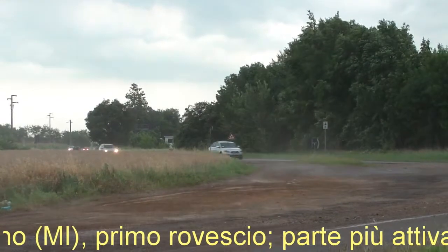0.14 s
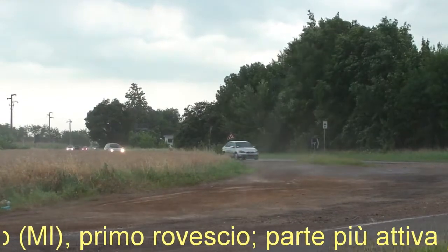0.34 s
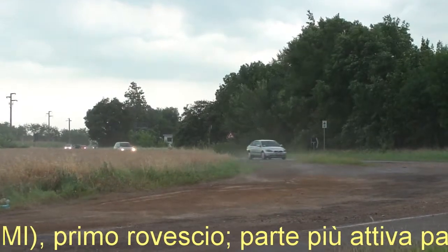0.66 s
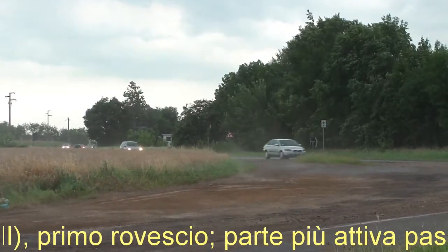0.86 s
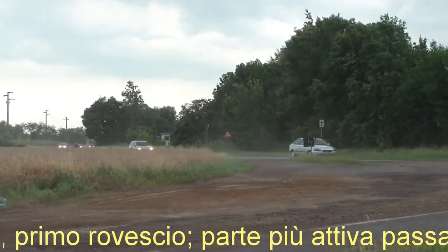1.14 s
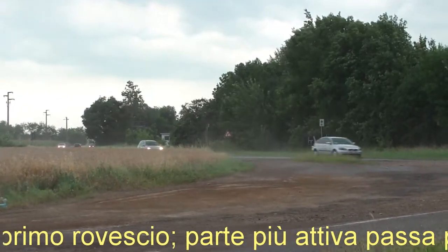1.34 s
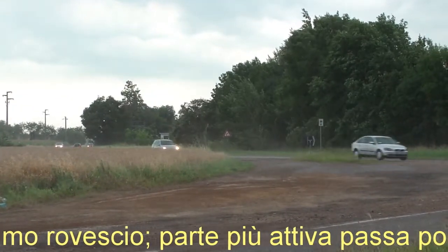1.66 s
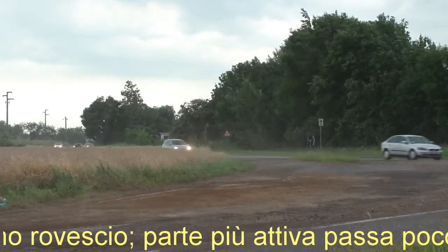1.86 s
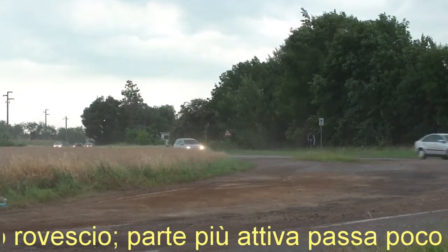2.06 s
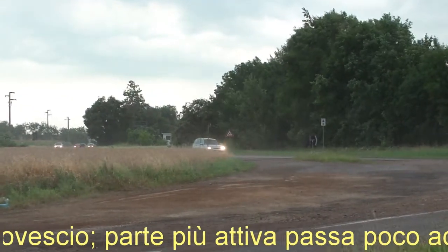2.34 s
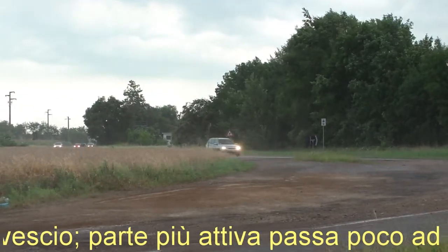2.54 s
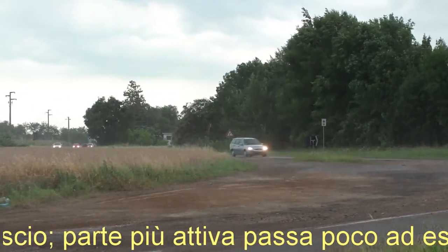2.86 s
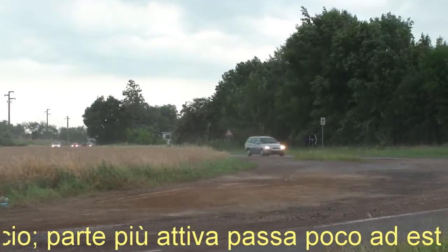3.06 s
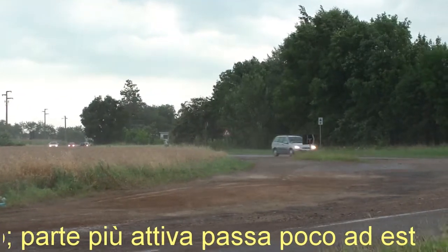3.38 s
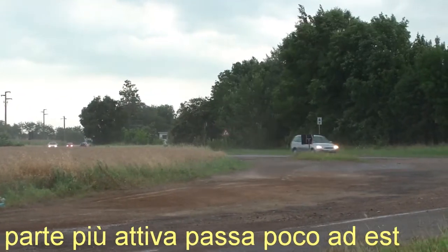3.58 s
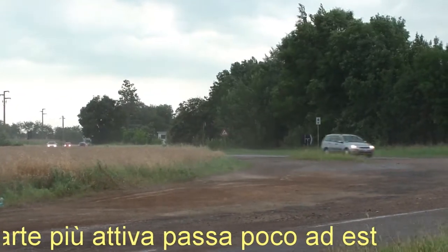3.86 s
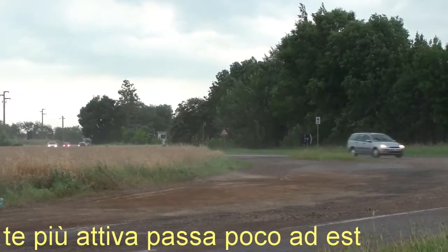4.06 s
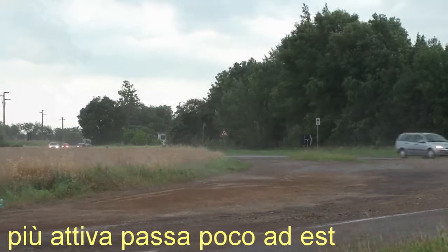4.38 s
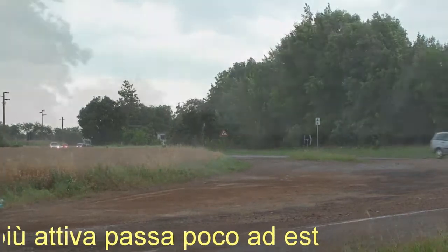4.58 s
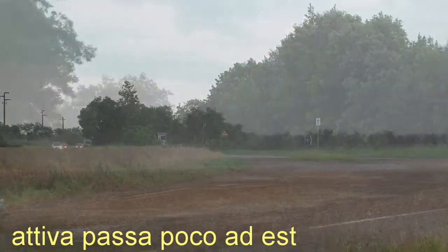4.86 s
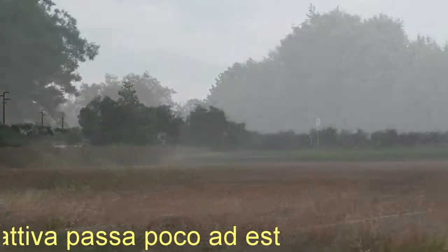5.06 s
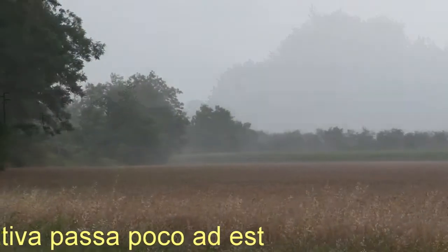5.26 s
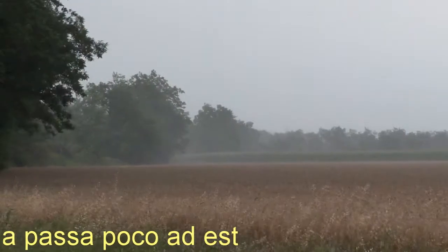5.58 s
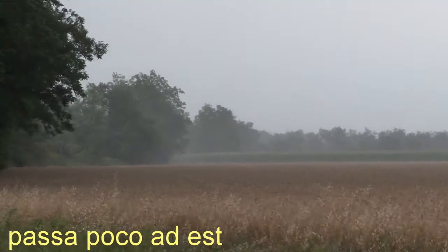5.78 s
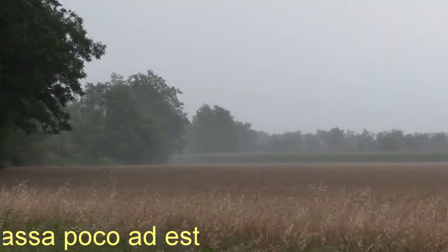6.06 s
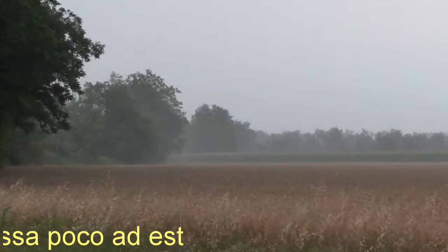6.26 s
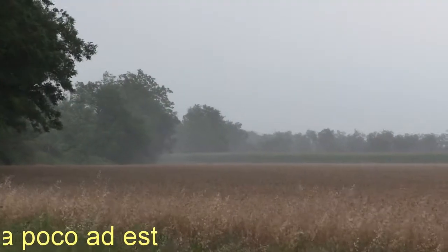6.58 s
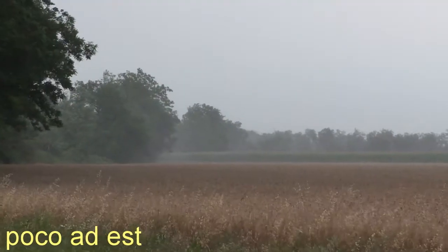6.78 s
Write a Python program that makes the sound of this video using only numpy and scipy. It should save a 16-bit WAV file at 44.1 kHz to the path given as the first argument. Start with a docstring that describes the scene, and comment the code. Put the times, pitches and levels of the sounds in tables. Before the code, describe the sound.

Gusty wind buffets an exposed microphone in fluttering bursts while dense rain hisses all round and hard drops tick sharply close by.

```python
"""Open fields in a squall, heard from a small stereo microphone standing in the wind.
On the grille, gusts flutter as shaken bands of noise, with popping vortices and a few breathy notes;
a low rumble of filtered noise lies under them and strengthens near the end.
All round, dense rain hisses as noise; close by, flurries of spray crackle and hard drops tick as
short ringing bursts. One heavy drop knocks on the housing."""
import sys
import numpy as np
from scipy import signal
from scipy.fft import rfft, irfft, next_fast_len
from scipy.io import wavfile
from scipy.ndimage import uniform_filter1d

SR = 44100
rng = np.random.default_rng(int(sys.argv[2]) if len(sys.argv) > 2 else 0)


def inscribe(sig):
    """Save sig as 16-bit PCM at rate SR to the path in sys.argv[1].

    A 1-D sig is mono; a 2-D sig holds one channel per row.
    Samples are clipped to [-1, 1] before scaling.
    """
    pcm = np.round(np.clip(np.atleast_2d(sig).T, -1, 1) * 32767)
    wavfile.write(sys.argv[1], SR, pcm.astype(np.int16))


N = 305613
T = np.arange(N) / SR

# Levels in the tables are those before the trims set in scene().
# strength of the wind at the grille: (time [s], level [dB])
WIND_LEVEL = [(0.0, -21), (1.58, -21.5), (1.77, -26), (2.01, -23.5), (2.3, -22), (2.53, -17), (2.91, -22),
              (3.3, -18.5), (3.59, -26.5), (3.98, -22), (4.4, -30.5), (4.65, -25.5), (4.8, -26),
              (5.09, -23), (5.54, -26.5), (5.98, -22), (6.52, -27.5), (6.93, -22)]
# brief lulls, when the wind drops away: (time [s], depth [dB])
WIND_LULLS = [(0.46, 2.5), (0.525, 6), (0.85, 4.5), (1.243, 12), (1.575, 4), (1.77, 6), (1.92, 4),
              (2.254, 7), (2.935, 6), (3.14, 2), (3.63, 1), (4.095, 6.5), (4.59, 5.5), (5.39, 3), (6.25, 0),
              (6.86, 3)]
# the hardest eddies striking the grille: (time [s], level [dB], nominal length [s])
HARD_BUFFETS = [(0.003, -11, 0.014), (0.046, -12.5, 0.0066), (0.119, -13.5, 0.014), (0.205, -16.5, 0.03),
                (0.242, -13.5, 0.041), (0.288, -22, 0.0098), (0.326, -14, 0.03), (0.39, -15.5, .022),
                (0.477, -14.5, 0.02), (0.656, -17.5, 0.027), (0.729, -14, 0.013), (0.877, -19.5, 0.022),
                (0.908, -18, .027), (0.965, -13, 0.022), (1.0, -15, 0.0087), (1.039, -14, 0.016),
                (1.077, -11.5, 0.023), (1.107, -16, 0.012), (1.278, -15, 0.035), (1.306, -12.5, 0.017),
                (1.5, -13, 0.01), (1.615, -16.5, 0.03), (1.679, -16.5, 0.05), (1.788, -20, 0.02),
                (1.815, -24, 0.017), (1.974, -23.5, 0.047), (2.079, -15, 0.051), (2.139, -15, 0.037),
                (2.18, -6, 0.0071), (2.197, -14, 0.026), (2.237, -16.5, 0.013), (2.264, -12.5, 0.024),
                (2.287, -13.5, 0.066), (2.353, -6.5, 0.016), (2.379, -10, 0.02), (2.527, -7.5, 0.014),
                (2.56, -6.5, 0.0048), (2.622, -12, 0.025), (2.788, -13, 0.021), (2.81, -12.5, 0.016),
                (2.978, -6.5, 0.007), (3.041, -15.5, 0.015), (3.096, -16.5, 0.016), (3.161, -17, 0.0087),
                (3.2, -16.5, 0.027), (3.247, -15, 0.028), (3.29, -29, 0.0094), (3.317, -15.5, 0.039),
                (3.351, -9, 0.02), (3.443, -14, 0.014), (3.503, -20, 0.039), (3.541, -18, .014),
                (3.652, -16.5, 0.016), (3.725, -18, 0.052), (3.802, -14, 0.015), (3.827, -20, 0.016),
                (3.88, -18, 0.029), (3.916, -10.5, 0.014), (3.963, -16.5, 0.022), (3.996, -17.5, 0.011),
                (4.151, -13.5, 0.036), (4.26, -21.5, .01), (4.319, -20, 0.014), (4.37, -16.5, 0.023),
                (4.619, -20.5, 0.015), (4.661, -23, 0.043), (4.742, -24, 0.0071), (4.834, -17.5, 0.012),
                (4.931, -18, .012), (5.026, -20, 0.0078), (5.123, -21.5, 0.016), (5.182, -16, 0.03),
                (5.261, -16, 0.04), (5.303, -17.5, 0.018), (5.416, -21, 0.036), (5.749, -18.5, .015),
                (5.859, -14.5, 0.023), (5.961, -16.5, 0.03), (6.017, -19, 0.033), (6.06, -13, 0.042),
                (6.135, -14, .01), (6.278, -17.5, 0.02), (6.386, -13, 0.0086), (6.461, -19, 0.044),
                (6.655, -17, 0.016), (6.694, -18.5, 0.025), (6.77, -18, 0.027), (6.902, -15.5, 0.02)]
# brightness of the flutter: (time [s], tilt [dB per octave])
FLUTTER_TILT = [(0.0, 1), (1.4, 0.3), (2.1, 2.5), (3.35, 0.1), (3.9, 3), (4.55, -1.1), (5.0, 0.7),
                (6.93, 0.6)]
# the wind sound leans further left over this stretch: (time [s], left over right [dB])
WIND_LEAN = [(4.5, 0.1), (5.2, 1.46)]
# spectrum of the flutter on the grille: (frequency [Hz], relative level per hertz [dB])
FLUTTER_SPECTRUM = [(30, -70), (100, -51), (200, -29), (330, -7), (520, -2), (700, 2), (900, -2.5),
                    (1200, -3.5), (1750, -8.5), (2200, -14), (2600, -23), (3000, -31), (4500, -32),
                    (12000, -68)]
# likeness of the two microphone channels in the wind: (frequency [Hz], correlation [-1 to 1])
WIND_CORRELATION = [(25, .25), (70, 1), (150, 0.98), (500, 0.96), (1200, 0.94), (2400, 0.82), (5000, 0.3)]
# breathy notes of wind in the housing:
# (time [s], level [dB], nominal length [s], frequency [Hz], resonance width [Hz])
HOUSING_NOTES = [(1.167, -27, 0.06, 1300, 380), (1.302, -14, 0.022, 690, 160), (2.348, -16, 0.02, 710, 200)]
# level of the rumble against the flutter: (time [s], level [dB])
RUMBLE_LEVEL = [(0.0, 0), (1.2, 4.5), (2.2, 0), (3.5, -2.5), (4.2, 4), (4.85, -0.5), (5.4, 11.5),
                (6.05, 8.5), (6.5, 12), (6.93, 8.5)]
# spectrum of the large eddies: (frequency [Hz], relative level per hertz [dB])
RUMBLE_SPECTRUM = [(30, -57), (70, -58), (100, -13.5), (130, -9), (188, 3.5), (250, -2), (330, 3),
                   (550, -1), (1200, -66), (4000, -80)]
# deep thumps of wind: (time [s], level [dB], nominal length [s])
WIND_THUMPS = [(0.97, -30, 0.045), (5.29, -38, .05), (5.42, -32, 0.046), (5.725, -22.5, 0.049),
               (6.14, -24, 0.058), (6.64, -31, 0.05)]
# spectrum of the thumps: (frequency [Hz], relative level per hertz [dB])
THUMP_SPECTRUM = [(30, -40), (60, -34), (95, -10), (130, 3.5), (175, 6), (260, -4), (600, -30), (2000, -90)]
# spectrum of the steady roar of the air: (frequency [Hz], relative level per hertz [dB])
AIR_SPECTRUM = [(20, -30), (35, -22), (60, 3), (100, 7), (250, -24), (1500, -70)]
# hard drops close by: (time [s], level of the energy spread over 1 ms [dB], left over right [dB])
HARD_DROPS = [(0.0137, -14, -1), (0.325, -16.5, 2), (0.431, -21, 13), (0.4608, -9, 5), (0.621, -18, 1),
              (0.6666, -18, 1), (0.7348, -15, 4), (0.917, -15.5, 3), (0.9376, -19, 0), (1.087, -13, 0),
              (1.495, -16, 5), (1.7745, -20, 4), (1.7885, -21, 0), (1.964, -19, 3), (2.1976, -16, 4),
              (2.4084, -14.5, 0), (2.4825, -22, 3), (2.5723, -20, -1), (2.5867, -8.5, 2), (2.745, -11, 2),
              (2.7682, -10, -2), (2.8122, -9.5, 3), (2.8459, -22, 2), (2.8662, -17.5, 4),
              (2.8915, -13.5, 2), (2.956, -25, 3), (2.9676, -24, 4), (3.0522, -16, 2), (3.0614, -11.5, 2),
              (3.0821, -16.5, 0), (3.1019, -20, 2), (3.1244, -14, 3), (3.1582, -19, 1), (3.2215, -18, 2),
              (3.2464, -3.5, 7), (3.2574, -19, 3), (3.295, -20, 0), (3.344, -6, 0), (3.405, -9, 2),
              (3.438, -14, 3), (3.463, -14.5, -3), (3.488, -19, 2), (3.6034, -16, 2), (3.6447, -19, 3),
              (3.653, -13.5, 5), (3.6774, -19, 2), (3.7029, -20, 5), (3.7417, -18, 0), (3.7631, -17, 0),
              (3.8354, -13, 6), (3.906, -13.5, 5), (3.916, -17, 2), (3.9625, -14, 5), (4.039, -11, 4),
              (4.0847, -9, 0), (4.1308, -13, -2), (4.1485, -26, 2), (4.205, -18, 6), (4.23, -14, 3),
              (4.275, -21, 4), (4.386, -16.5, 14), (4.4372, -19.5, 3), (4.4492, -16.5, 2), (4.652, -19, -4),
              (5.3932, -12, 3), (5.7042, -19, -6), (5.9057, -14.5, -1), (5.9605, -20.5, -11),
              (6.2113, -23, -6), (6.69, -14, 1)]
# resonances of the struck housing: (frequency [Hz], width [Hz], peak level [dB])
HOUSING_MODES = [(1000, 700, -14), (1660, 185, -10), (2320, 160, -17.5)]
# the strongest flurries of blown spray: (time [s], level [dB], nominal length [s])
STRONG_FLURRIES = [(0.429, -33.5, 0.015), (0.539, -25.5, 0.0043), (2.083, -32, 0.032),
                   (2.135, -31.5, 0.025), (2.181, -27.5, 0.019), (2.486, -30.5, 0.016), (2.558, -32, 0.011),
                   (2.733, -27, 0.016), (3.202, -30.5, 0.011), (3.254, -38, 0.008), (3.824, -32.5, 0.025),
                   (4.12, -27.5, 0.018), (5.864, -34, 0.0068)]
# spectrum of the spray: (frequency [Hz], relative level per hertz [dB])
SPRAY_SPECTRUM = [(200, -24), (1500, 7.5), (2600, -9), (3400, -7.5), (4300, -5.5), (5000, -4.5),
                  (6100, 3.5), (7300, -1), (9600, -4.5), (10800, -10), (11600, -45)]
# strength of the rain all round: (time [s], level [dB])
RAIN_LEVEL = [(0.0, -36), (0.77, -36), (1.77, -38), (2.7, -34.5), (3.55, -35.5), (4.05, -34.5), (4.73, -40),
              (4.94, -40.5), (6.93, -40.5)]
# spectrum of the far rain: (frequency [Hz], relative level per hertz [dB])
HISS_SPECTRUM = [(700, -7), (2000, 5.5), (2900, -9), (4000, -9), (5000, -8), (5800, 3.5), (7200, 4.5),
                 (8300, 2), (9700, 2), (10600, -3), (11400, -14), (12200, -48)]
# likeness of the two microphone channels in the rain: (frequency [Hz], correlation [-1 to 1])
RAIN_CORRELATION = [(1000, -0.94), (3000, 0.9), (6000, 0.24), (8500, -0.07), (11000, -0.26)]
# the recorder's tone filter hollows out the presence range: (frequency [Hz], width [Hz])
TONE_NOTCHES = [(3010, 430), (4000, 590), (5010, 670)]

LULL_S = 0.028
# the flow stalls ahead of each hard buffet
STALL_DB, STALL_S = 5.5, 0.014
# lesser eddies come at uneven gaps, at a level relative to the wind
EDDIES_PER_S, EDDY_DB, EDDY_SPREAD_DB, EDDY_S = 30, -4, 1, 0.0076
# the rumble takes a share of the wind's slow swings (gusts) and fast ones (eddies)
USUAL_WIND_DB, RUMBLE_DB = -25, -38.5
RUMBLE_FOLLOWS_GUST, RUMBLE_FOLLOWS_EDDY = 0.98, 0.62
# pitch of each hard drop strays around a centre
DROP_HZ, DROP_SPREAD_OCTAVES = 7050, 0.22
# big drops ring in a wider resonance: dB of width per dB of size
DROP_WIDTH_HZ, DROP_WIDENING = 3300, 0.27
SPLASH_S, SPLASH_TAIL_DB, SPLASH_TAIL_S = 0.0005, -22, 0.003
KNOCK_S = 0.541
# a small drop rings for only a cycle or two, so its resonance is wide
PATTER_WIDTH_HZ = 3000
# lesser flurries, relative to the rain; they grow faster than the rain itself (extra dB per dB)
FLURRIES_PER_S, FLURRY_DB, FLURRY_SPREAD_DB = 41, -3, 2
FLURRY_S, FLURRY_GROWTH = 0.0079, 0.33
TREBLE_END_HZ, CUTOFF_HZ = 11200, 15700


def flutter(level_db, tilt_db, base_db, buffet_db, shake_db, patchy_db, wander_db, lag_cycles, bright):
    """Turbulence on the grille: bands shake together, their colour wanders and the lows come late."""
    steady = from_db(level_db + base_db + shake_db * jolts(per_s=56, fade_s=0.023))
    lesser_rows = lesser_bursts(EDDIES_PER_S, EDDY_DB, EDDY_SPREAD_DB, EDDY_S)
    lesser = burst_power(lesser_rows, attack_s=0.003, stretch=0.99)
    hard = burst_power(HARD_BUFFETS, attack_s=0.0003, stretch=0.9, rise_share=0.11)
    flow = steady ** 2 + from_db(level_db) ** 2 * lesser
    flow = flow * from_db(-stalls()) ** 2
    force = np.sqrt(flow + from_db(buffet_db) ** 2 * hard)
    eddy = force / from_db(level_db + base_db)  # force against the plain wind
    # brightness follows the tilt, almost the same for weak and strong eddies
    octave_gain = from_db(tilt_db) * eddy ** bright
    centres = np.geomspace(300, 2400, 13)
    bands = noise_bands(FLUTTER_SPECTRUM, WIND_CORRELATION, centres)
    # the noise's own swings are evened out, so the eddies set the level
    swing = np.sqrt(uniform_filter1d(np.mean(sum(bands) ** 2, axis=0), size=400))
    swing = uniform_filter1d(swing, size=200)
    out = 0
    for hz, band in zip(centres, bands / swing):
        late_s = lag_cycles * (1 / hz - 1 / centres[-4])
        coloured_force = force * octave_gain ** np.log2(hz / np.median(centres))
        envelope = np.interp(T - late_s, T, coloured_force)
        patches_db = patchy_db * jolts(per_s=90, fade_s=0.0047)
        out = out + band * envelope * from_db(patches_db + wander_db * drift(7.2))
    return out, eddy


def lulls():
    """How far the wind has dropped, in dB: each lull eases in and out."""
    return sum(db * np.exp(-((T - s) / LULL_S) ** 2) for s, db in WIND_LULLS)


def stalls():
    """How far the flow has sagged, in dB: it sinks ahead of a hard buffet and returns with it."""
    starts = np.append(np.sort(np.array(HARD_BUFFETS)[:, 0]), 2 * N / SR)
    wait_s = starts[np.searchsorted(starts, T)] - T
    return STALL_DB * np.exp(-(wait_s / STALL_S) ** 2)


def burble(level_db, eddy, trim_db, per_s, spread_db, cycles, count):
    """Single vortices pop inside the eddies, each ringing for a few cycles at a pitch of its own."""
    born = np.flatnonzero(rng.random(N) < per_s / SR)
    size, pitch, sign = rng.random((len(born), 3)).T
    strength = rms_one(from_db(spread_db * size)) * np.sign(sign - 0.5)
    strength = strength * eddy[born] * from_db(level_db[born])
    out = 0
    for k, hz in enumerate(np.geomspace(420, 2100, count)):
        clicks = np.zeros(N)
        clicks[born] = strength * ((pitch * count).astype(int) == k)
        out = out + ring(clicks, hz, hz / cycles) * from_db(at_hz(FLUTTER_SPECTRUM, hz))
    out = signal.sosfilt(signal.butter(4, 2600, fs=SR, output="sos"), out)
    wind_rms = np.sqrt(np.mean((eddy * from_db(level_db)) ** 2))
    return rms_one(out) * wind_rms * from_db(trim_db)


def rumble(wind_db, eddy, bass_db, lumpy_db, thump_db, air_db, inertia_s):
    """Large eddies push the whole microphone, swelling with gusts, over thumps and a faint steady roar."""
    body, = noise_bands(RUMBLE_SPECTRUM, WIND_CORRELATION, [1])
    thump, = noise_bands(THUMP_SPECTRUM, WIND_CORRELATION, [1])
    air, = noise_bands(AIR_SPECTRUM, WIND_CORRELATION, [1])
    thump = thump * np.sqrt(burst_power(WIND_THUMPS, attack_s=0.014, stretch=0.82))
    # the microphone's inertia smooths the eddies
    push = rms_one(uniform_filter1d(eddy, int(inertia_s * SR)) ** RUMBLE_FOLLOWS_EDDY)
    level_db = RUMBLE_DB + RUMBLE_FOLLOWS_GUST * (wind_db - USUAL_WIND_DB) + bass_db
    body = body * push * from_db(level_db + lumpy_db * drift(4.8))
    return body + thump * from_db(thump_db) + air * from_db(air_db)


def whoops():
    """Now and then an eddy catches an opening in the housing, which sounds a breathy note."""
    out = 0
    for s, db, length_s, hz, width_hz in HOUSING_NOTES:
        breath = rng.standard_normal(N)
        note = rms_one(ring(ring(breath, hz, width_hz), hz, width_hz))
        note = note / np.sqrt(uniform_filter1d(note ** 2, size=500) + 1e-9)  # evened out
        power = burst_power([(s, db, length_s)], attack_s=0.0029, stretch=1.0)
        out = out + note * np.sqrt(power)
    return out


def drops(trim_db, crack_db, growth, apart):
    """A hard drop close by is a sub-millisecond treble snap, longer if big, with a faint spatter after it."""
    out = np.zeros((2, N))
    age = np.arange(-SR // 500, SR // 50) / SR
    usual_db = np.median(np.array(HARD_DROPS)[:, 1])
    for s, db, left_db in HARD_DROPS:
        hz = DROP_HZ * 2 ** (DROP_SPREAD_OCTAVES * rng.uniform(-1, 1))
        size = from_db(max(db - usual_db, 0))
        splash_s = SPLASH_S * size ** growth
        width_hz = DROP_WIDTH_HZ * size ** DROP_WIDENING
        spatter = from_db(SPLASH_TAIL_DB) * np.exp(-age / SPLASH_TAIL_S) * (age > 0)
        envelope = np.exp(-(age / splash_s) ** 2) + spatter
        shared, *own = rng.standard_normal((3, len(age)))  # one noise for both channels, one for each
        crack = ring((shared + apart * np.array(own)) * envelope, hz, width_hz)
        tick = ring(crack, hz, width_hz) + from_db(crack_db) * crack
        millisecond_rms = np.sqrt(np.sum(tick ** 2, axis=1, keepdims=True) / (SR / 1000))
        tick = tick * pan(left_db) / millisecond_rms
        at = int((s + age[0]) * SR)
        out[:, at:at + len(age)] += tick * from_db(db + trim_db)
    return out


def knock():
    """A heavy drop strikes the housing, which rings for a few milliseconds."""
    blow = (np.arange(N) == int(KNOCK_S * SR)) * 1.0
    rings = np.array([ring(ring(blow, hz, width_hz), hz, width_hz) for hz, width_hz, db in HOUSING_MODES])
    rings = rings / np.abs(rings).max(axis=1, keepdims=True)
    return from_db(np.array(HOUSING_MODES)[:, 2]) @ rings


def patter(level_db, trim_db, per_s, crowding, spread_db, width_hz, count):
    """Small near drops tick at random, more often in heavier rain, at varied pitches and sides."""
    crowd = from_db(crowding * (level_db - np.mean(level_db)))
    born = np.flatnonzero(rng.random(N) < per_s * crowd / SR)
    size, side, pitch, sign = rng.random((len(born), 4)).T
    strength = from_db(spread_db * size ** 2) * np.sign(sign - 0.5) * pan(24 * (side - 0.5))
    out = 0
    for k, hz in enumerate(np.geomspace(6200, 9200, count)):
        clicks = np.zeros((2, N))
        clicks[:, born] = strength * ((pitch * count).astype(int) == k)
        out = out + ring(ring(clicks, hz, width_hz), hz, width_hz)
    return rms_one(out) * from_db(level_db + trim_db)


def spray(level_db, eddy, flurry_db, carried_db, crackle_db):
    """Fine droplets crackle on the microphone in flurries, most in heavy rain; eddies carry a few along."""
    strong = from_db(flurry_db) ** 2 * burst_power(STRONG_FLURRIES, attack_s=0.00046, stretch=1.0)
    lesser_rows = lesser_bursts(FLURRIES_PER_S, FLURRY_DB, FLURRY_SPREAD_DB, FLURRY_S)
    lesser = burst_power(lesser_rows, attack_s=0.00087, stretch=0.83)
    lesser = lesser * from_db(level_db + FLURRY_GROWTH * (level_db - level_db.mean())) ** 2
    carried = (from_db(level_db + carried_db) * eddy) ** 2
    band, = noise_bands(SPRAY_SPECTRUM, [(1000, 0.98), (5000, 0.57), (10000, 0.1)], [1])
    crackle = from_db(crackle_db * jolts(per_s=260, fade_s=0.00066))
    return band * np.sqrt(strong + lesser + carried) * crackle


def hiss(level_db, base_db, shimmer_db):
    """Countless far drops merge into a shimmering hiss."""
    wash, = noise_bands(HISS_SPECTRUM, RAIN_CORRELATION, [1])
    return wash * from_db(level_db + base_db + shimmer_db * jolts(per_s=140, fade_s=0.0095))


def lesser_bursts(per_s, level_db, spread_db, length_s):
    """Rows (time [s], level [dB], length [s]) of bursts, one at a chance moment in each beat of the rate."""
    chance = rng.random((200, 3))
    s = (np.arange(len(chance)) + chance[:, 0]) / per_s
    size, stretch = np.sqrt(12) * (chance[:, 1:].T - 0.5)  # mean 0, spread 1
    rows = np.c_[s, level_db + spread_db * size, length_s * np.sqrt(2) ** stretch]
    return rows[s < N / SR]


def burst_power(rows, attack_s, stretch, rise_share=0):
    """Power of short bursts: a quick rise, slower in long ones if rise_share is set, then a collapse."""
    power = np.zeros(N + SR)
    age = np.arange(SR // 5) / SR
    for s, db, length_s in rows:
        at = max(0, int(s * SR))
        rise = 1 - np.exp(-age / (attack_s + rise_share * length_s))
        collapse = np.exp(-(age / (stretch * length_s)) ** 2)
        power[at:at + len(age)] += from_db(db) ** 2 * rise * collapse
    return power[:N]


def jolts(per_s, fade_s):
    """Random kicks that jump up at once and fade; mean 0, spread 1."""
    kicks = (rng.random(N) < per_s / SR) * (1 + rng.random(N))
    level = signal.lfilter([1], [1, -np.exp(-1 / (fade_s * SR))], kicks)
    level = uniform_filter1d(np.sqrt(level + 0.5), size=60)
    return rms_one(level - level.mean())


def drift(rate_hz):
    """Slow random wander with spread 1, drawn every 40 samples and joined by lines."""
    r = np.exp(-80 * np.pi * rate_hz / SR)
    chance = rng.standard_normal(N // 40 + 2002)
    slow = signal.lfilter([1], [1, -2 * r, r * r], chance)[2000:]  # skip the run-in
    return np.interp(np.arange(N) / 40, np.arange(len(slow)), rms_one(slow))


def noise_bands(spectrum, correlation, centres):
    """Coloured stereo noise, split into overlapping bands whose powers add up to 1."""
    size = next_fast_len(N)
    hz = np.arange(size // 2 + 1) * SR / size
    alike = np.clip(at_hz(correlation, hz), -1, 1)
    gain = rms_one(from_db(at_hz(spectrum, hz)))
    bands = []
    for own in np.eye(len(centres)):
        mid, side = rfft(rng.standard_normal((2, size)))
        pair = np.sqrt((1 + alike) / 2) * mid + np.sqrt((1 - alike) / 2) * side * [[1], [-1]]
        share = at_hz(np.c_[centres, own], hz)
        bands.append(irfft(pair * gain * np.sqrt(share), size)[:, :N])
    return bands


def ring(clicks, hz, width_hz):
    """A two-pole resonance with a gain of about 1 at its top."""
    r = np.exp(-np.pi * width_hz / SR)
    feed = [(1 - r * r) / 2, 0, (r * r - 1) / 2]
    return signal.lfilter(feed, [1, -2 * r * np.cos(2 * np.pi * hz / SR), r * r], clicks + 1e-18)


def pan(left_db):
    """Channel gains for a level of left over right, in dB."""
    return from_db(np.array([[0.5], [-0.5]]) * left_db)


def at_hz(points, hz):
    """Read a table on a log-frequency axis."""
    f, value = np.transpose(points)
    return np.interp(np.log(hz + 1e-9), np.log(f), value)


def in_time(rows):
    """Second column of a (time, value) table, at every sample."""
    s, value = np.transpose(rows)
    return np.interp(T, s, value)


def from_db(db):
    """Decibels to gain."""
    return 10 ** (np.asarray(db) / 20)


def rms_one(x):
    """Scale to unit power."""
    return x / np.sqrt(np.mean(x ** 2) + 1e-20)


def scene():
    """Wind on the microphone, rain around it and a little to the left, drops close by."""
    wind_db = in_time(WIND_LEVEL) - lulls()
    rain_db = in_time(RAIN_LEVEL)
    wind, eddy = flutter(wind_db, in_time(FLUTTER_TILT), base_db=-3.0, buffet_db=-4.0, shake_db=1.5,
                         patchy_db=1.54, wander_db=1.82, lag_cycles=0.98, bright=0.0041)
    wind = wind + burble(wind_db, eddy, trim_db=-11.0, per_s=260, spread_db=10.5, cycles=17.4, count=24)
    wind = wind + rumble(wind_db, eddy, in_time(RUMBLE_LEVEL), lumpy_db=1.5, thump_db=-4.5,
                         air_db=-65.0, inertia_s=0.07)
    wind = wind + whoops()
    near = drops(trim_db=-3.0, crack_db=-15, growth=0.1, apart=1.0) + knock()
    near = near + patter(rain_db, trim_db=-6.5, per_s=260, crowding=2.0, spread_db=25,
                         width_hz=PATTER_WIDTH_HZ, count=6)
    rain = spray(rain_db, eddy, flurry_db=9.0, carried_db=-6.0, crackle_db=2.5)
    rain = rain + hiss(rain_db, base_db=2.5, shimmer_db=2.5)
    return wind * pan(in_time(WIND_LEAN)) + near + rain * pan(1.6)


def record(dry):
    """Three notches colour the sound and the treble ends steeply; full scale limits the peaks."""
    depth = 1 - from_db(-46.0)  # the notches stop 46 dB down
    for hz, width_hz in TONE_NOTCHES:
        notched = signal.lfilter(*signal.iirnotch(hz, hz / width_hz, fs=SR), dry)
        dry = dry + depth * (notched - dry)
    dry = signal.sosfilt(signal.cheby1(8, 0.2, TREBLE_END_HZ, fs=SR, output="sos"), dry)
    limited = np.clip(dry, -1, 1)
    return signal.sosfilt(signal.ellip(10, 0.1, 80, CUTOFF_HZ, fs=SR, output="sos"), limited)


dry = scene()
out = record(dry)
inscribe(out)
```